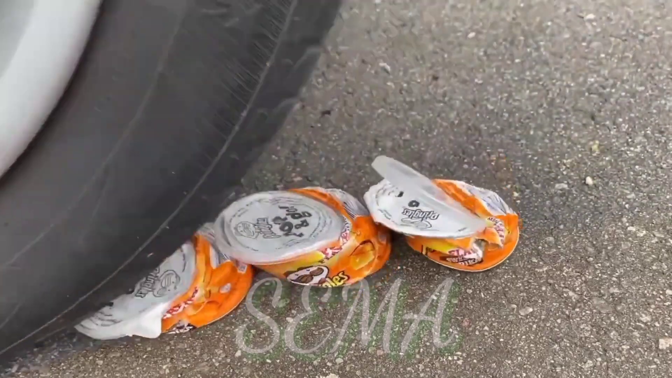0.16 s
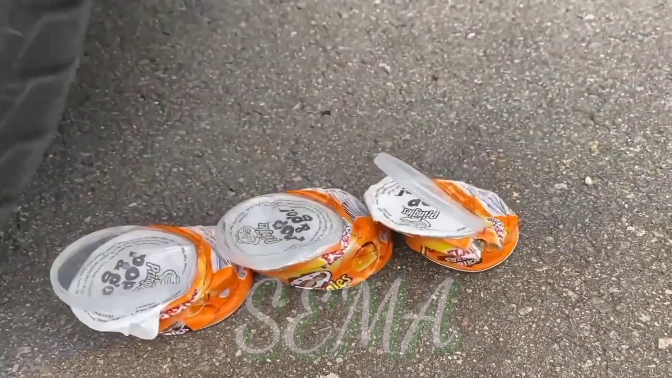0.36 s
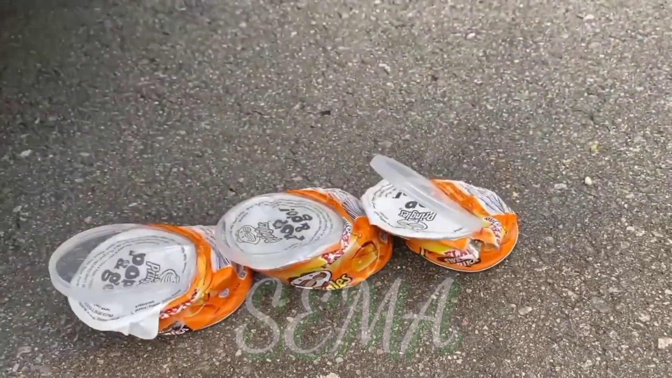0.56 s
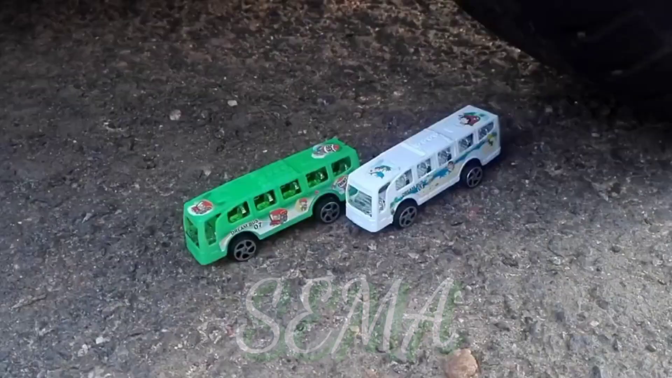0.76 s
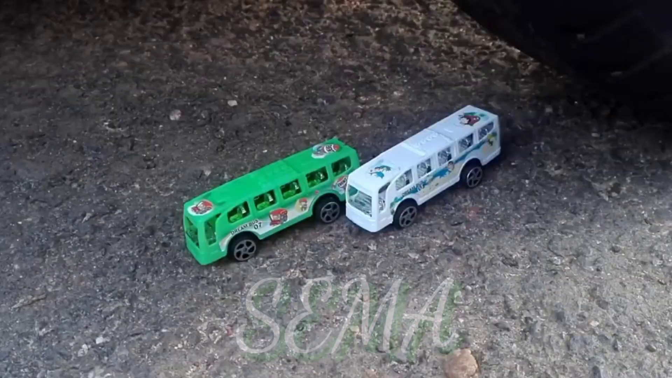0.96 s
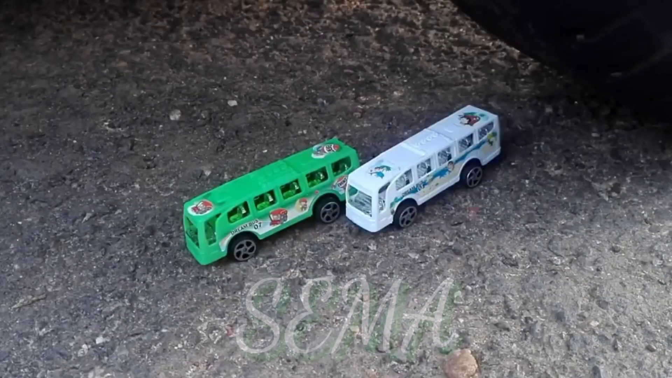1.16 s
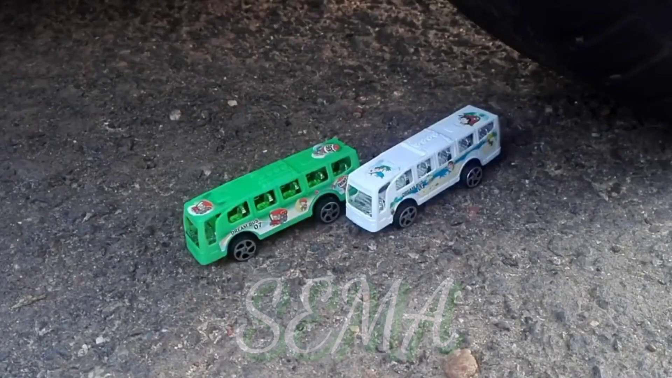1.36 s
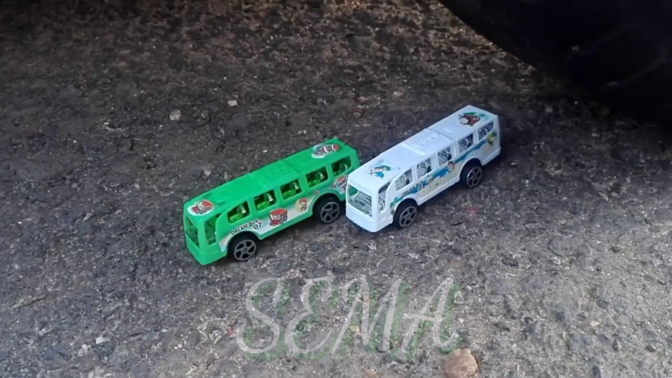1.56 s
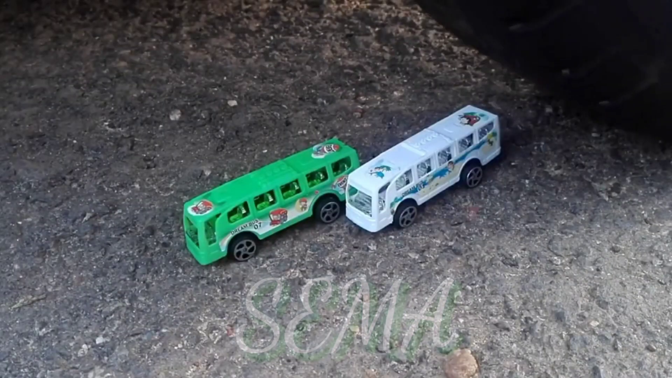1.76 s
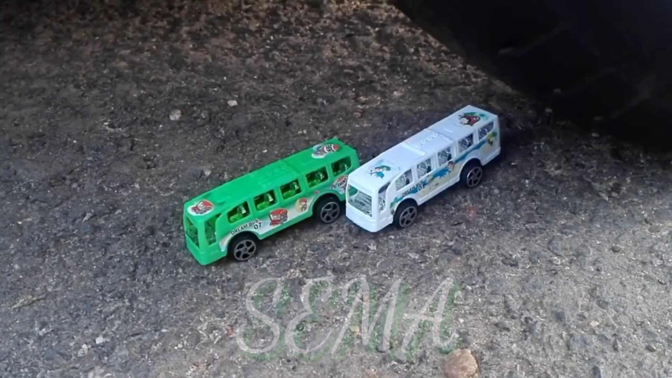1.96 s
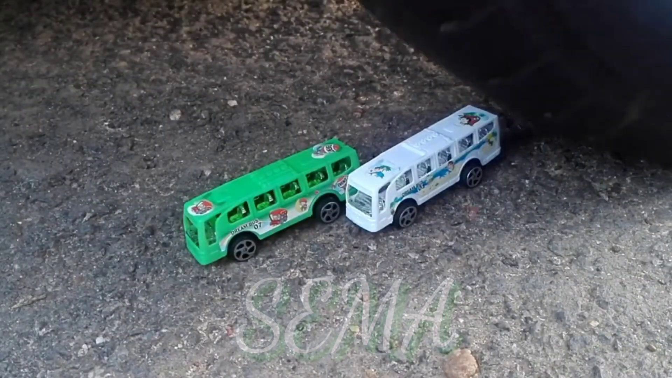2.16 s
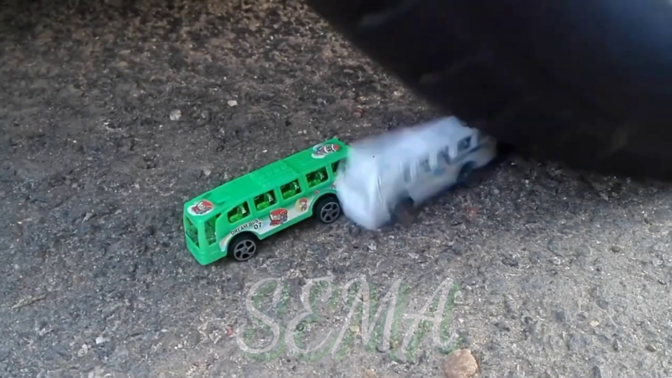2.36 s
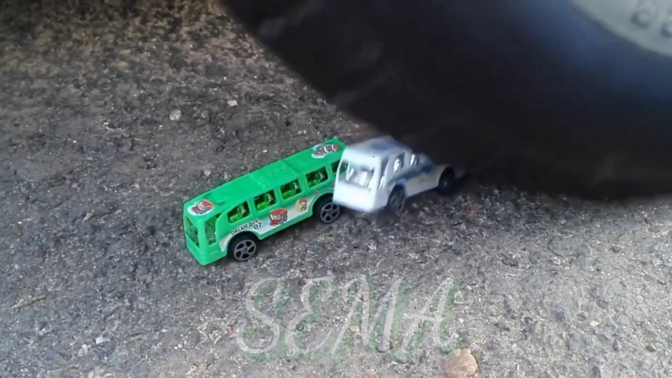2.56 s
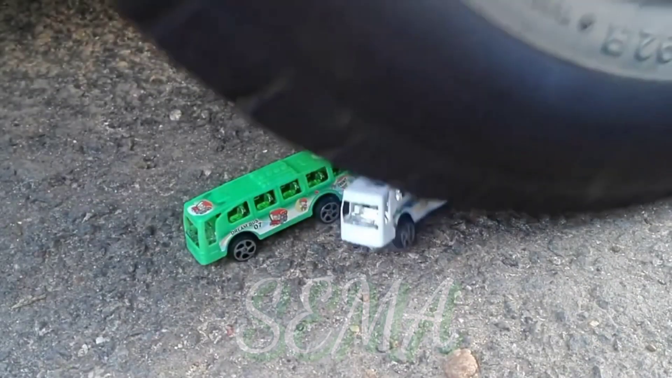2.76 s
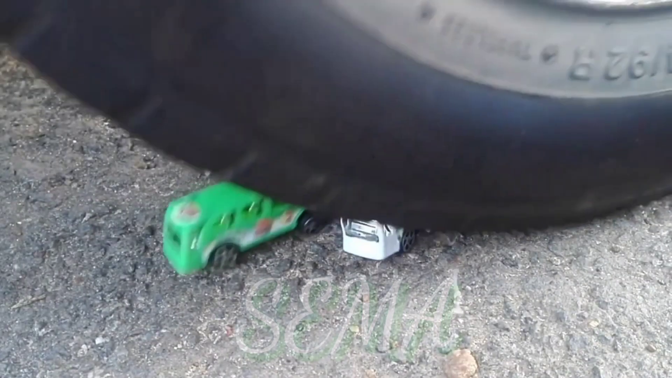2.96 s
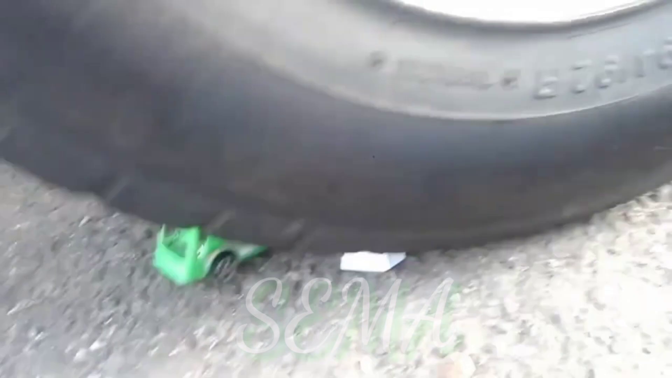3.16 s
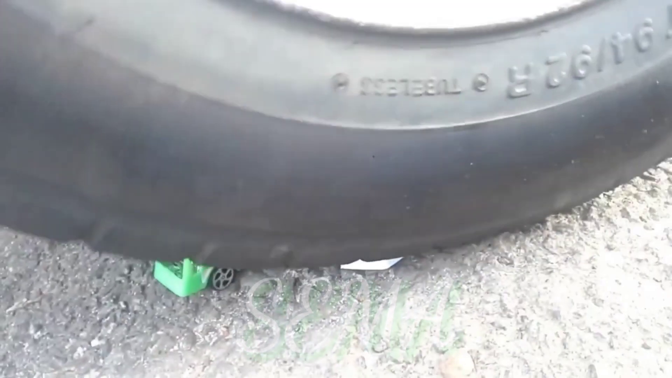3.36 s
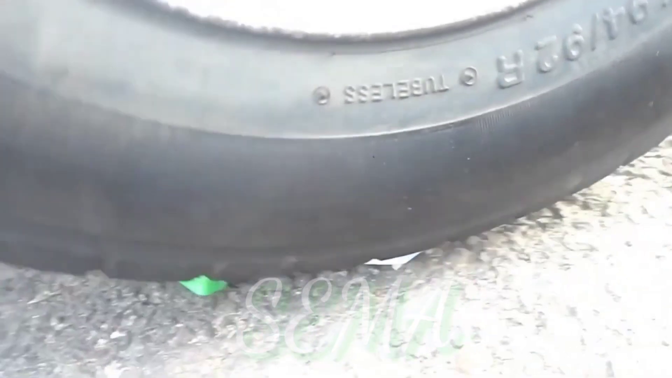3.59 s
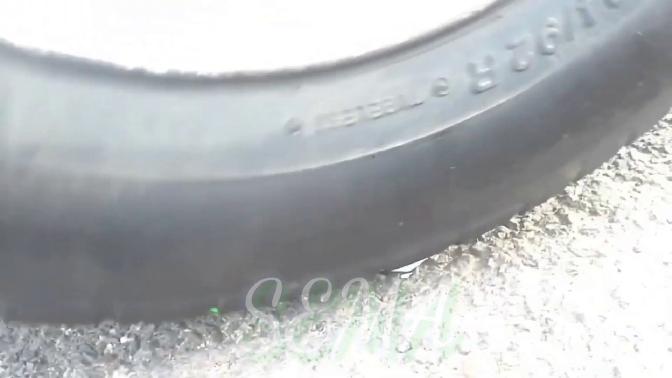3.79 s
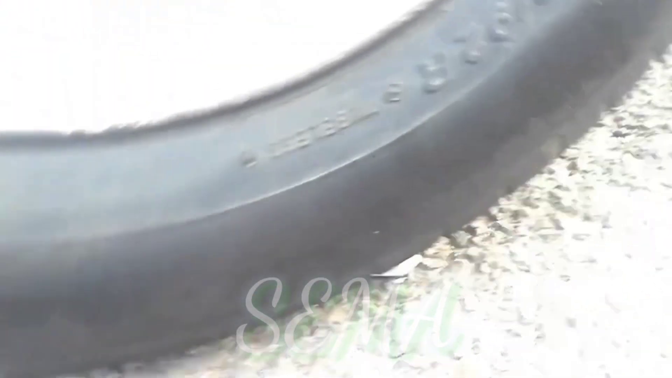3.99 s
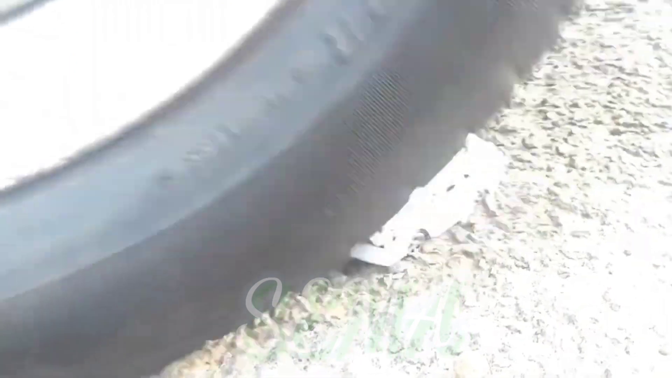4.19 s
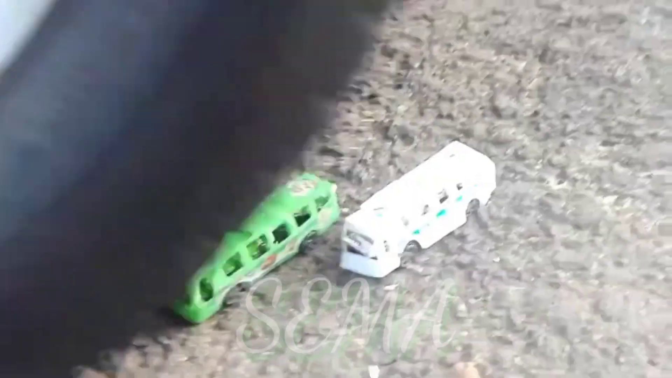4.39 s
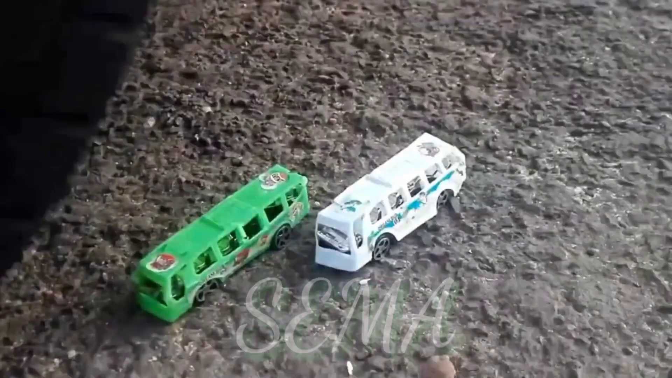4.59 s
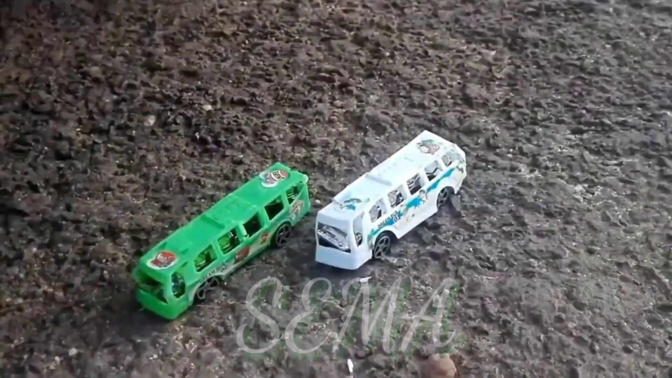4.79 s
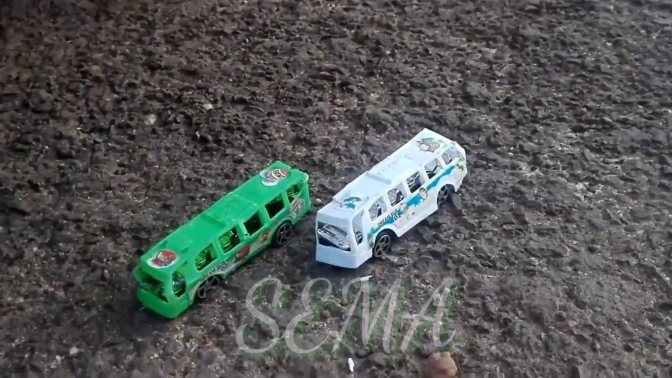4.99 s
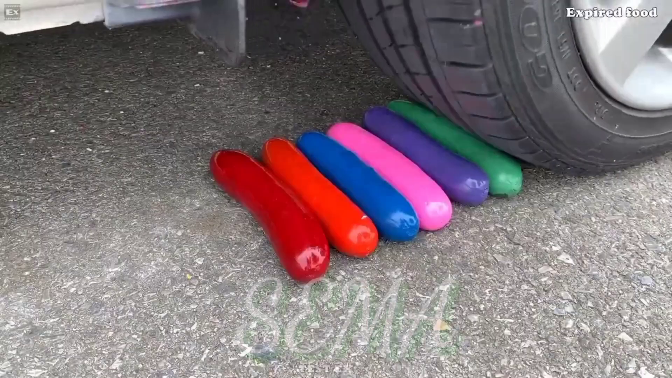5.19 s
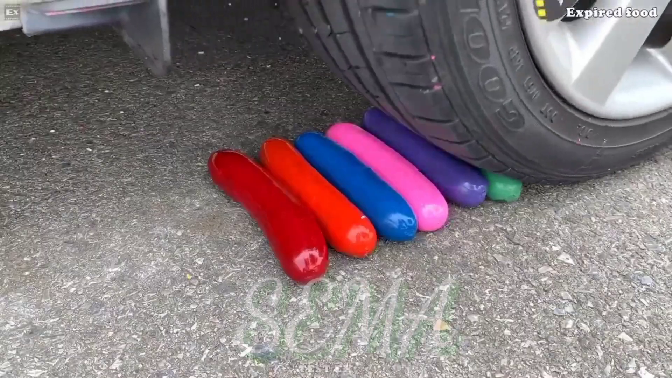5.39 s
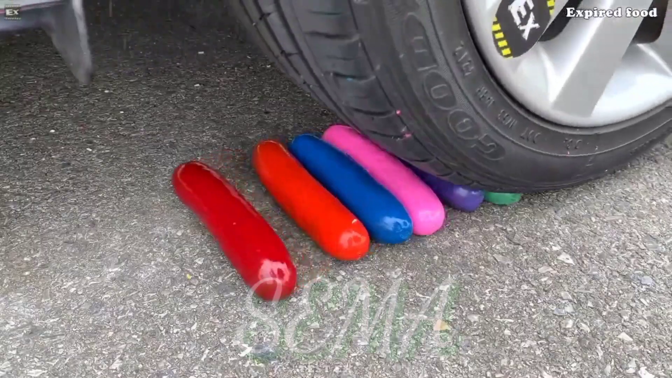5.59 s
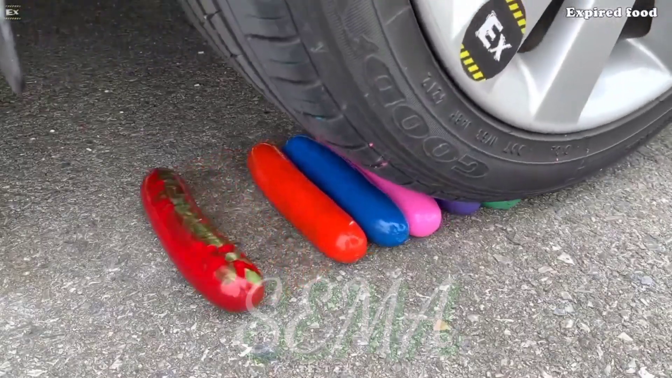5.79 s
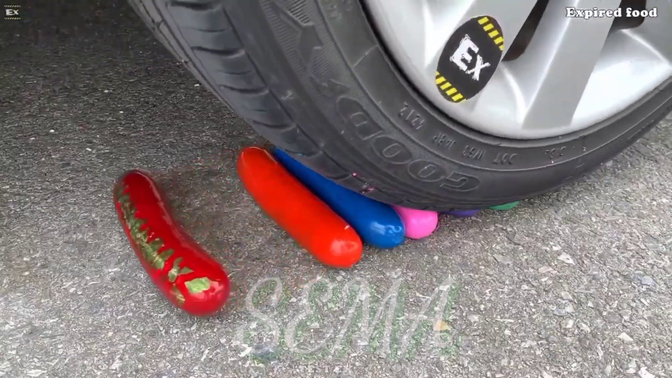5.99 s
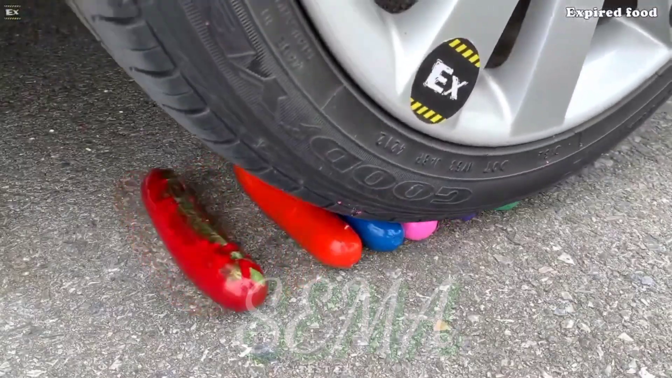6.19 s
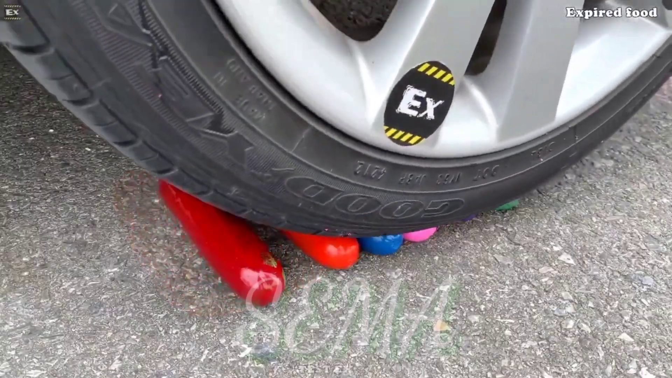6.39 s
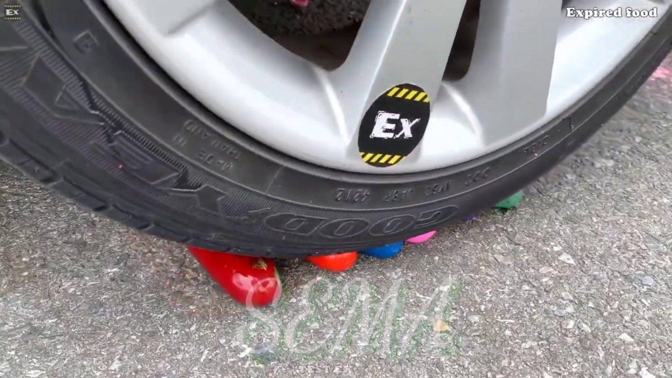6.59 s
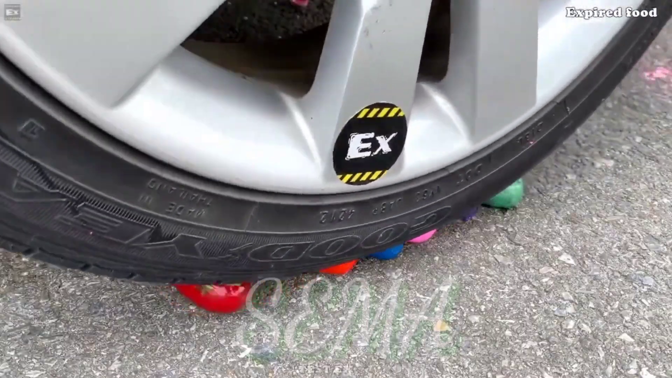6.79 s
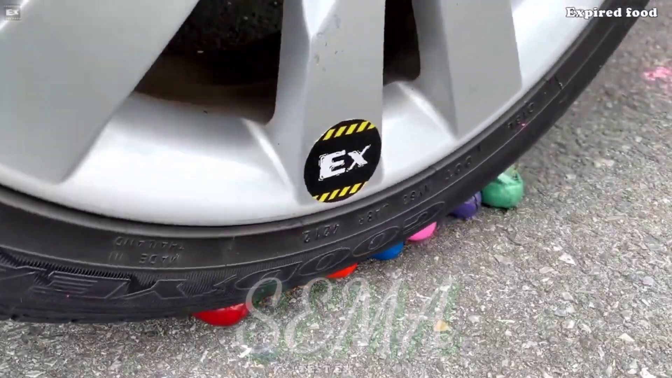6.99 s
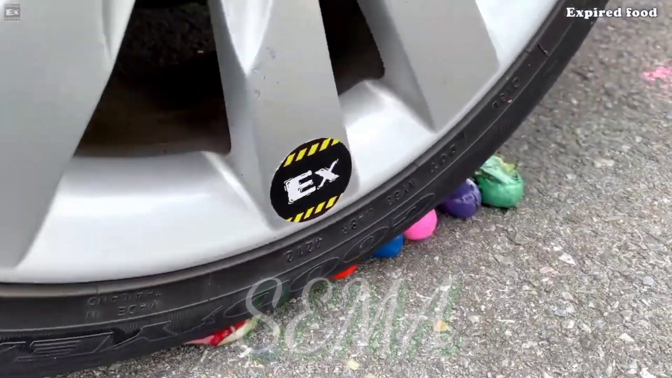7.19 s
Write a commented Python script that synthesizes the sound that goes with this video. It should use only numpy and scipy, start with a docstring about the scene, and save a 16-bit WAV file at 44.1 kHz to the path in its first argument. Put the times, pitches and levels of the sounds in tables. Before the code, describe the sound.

Outdoors, very close to a car tyre on rough asphalt. Soft cups pop with one sharp smack over a faint engine idle. The sound drops to quiet rolling with small ticks, then hard plastic toys break in a dense, bright volley of cracks. Freed pieces scrape and rattle lightly. Abruptly the rolling gets louder and wider, and brittle sticks snap with woody knocks while the engine pulls harder.

```python
"""Tread grinding on rough asphalt over rumble and engine idle; cups, then plastic toys, then brittle sticks break.
Three spliced shots: stereo, mono, stereo. Rolling is shaped noise; hum and engine are sines.
Each break sums a splinter burst, a short modal ring and a falling thump; slow crushing and rubs are grainy noise.
The engine pulls over the last sticks. Loud peaks saturate."""
import sys
import numpy as np
from scipy import signal
from scipy.fft import rfft, irfft, next_fast_len
from scipy.io import wavfile
from scipy.ndimage import uniform_filter1d, map_coordinates

SR = 44100
rng = np.random.default_rng(int(sys.argv[2]) if len(sys.argv) > 2 else 0)


def pcm_store(signal):
    """Save signal as 16-bit PCM."""
    levels = np.round(np.clip(np.atleast_2d(signal), -1, 1) * 32767)
    wavfile.write(sys.argv[1], SR, levels.astype(np.int16).T)


N = 319725

# rolling car, one table per shot: t/s, rumble level/dB, grinding level/dB
ROLL = [
    [(0.0, -32, -28), (0.04, -35.5, -42), (0.472, -36, -49), (0.756, -32.5, -49.5), (0.856, -31.5, -45),
     (0.97, -71, -50.5)],
    [(0.97, -48, -61.5), (1.18, -73.5, -57.5), (1.43, -39.5, -48), (1.64, -33, -44.5), (1.82, -44.5, -56.5),
     (2.04, -58.5, -90), (2.12, -32.5, -44), (2.52, -57, -83.5), (2.7, -66.5, -70.5), (3.07, -37, -48),
     (3.43, -44.5, -52.5), (3.8, -37, -63), (3.98, -33.5, -45.5), (4.21, -44.5, -56.5), (4.74, -55, -50.5),
     (4.81, -36, -45.5), (5.06, -46, -50.5), (5.24, -30, -48.5), (5.45, -47, -55.5)],
    [(5.46, -25, -49), (5.528, -22, -25.5), (5.65, -23.5, -34.5), (6.012, -20.5, -34), (6.302, -25.5, -31),
     (6.686, -19.5, -31), (6.876, -28.5, -34), (7.25, -32, -31.5)],
]
# per shot, over the driving level: drone/dB, grit/dB, hiss/dB
SHOT_LEVELS = [(0.5, -4, -24.5), (3.5, -6.5, -27), (1.5, -3, -7)]
# noise spectra: f/Hz, relative density/dB
RUMBLE = [(18, -20.5), (35, -13), (70, 5), (120, -4), (160, -15.5)]
DRONE = [(95, -19.5), (135, 9), (250, 4), (365, -3.5), (430, -9.5), (650, -31)]
GRIT = [(1500, -2), (2200, -3.5), (3500, -8), (5500, -14), (8000, -28), (12000, -44)]
HISS = [(4500, -16.5), (6500, -9.5), (9000, -10.5), (14300, -10), (15000, -28), (16500, -44)]
CRACKLE = [(1300, 5), (2000, -3.5), (4500, -9), (7000, -12.5), (14000, -14.5), (15000, -37)]
# splinter spectra of toys, sticks, cups: f/Hz, relative density/dB
PLASTIC = [(880, -3), (1500, -0.5), (2500, -1.5), (3880, -4), (7500, -5), (13100, -3.5), (14500, -1),
           (16400, -57)]
BRITTLE = [(880, -9.5), (1500, -13), (2310, -18.5), (3880, -23), (4690, -25.5), (13800, -26.5),
           (15400, -29), (16400, -65)]
CARD = [(880, -30.5), (1500, 7), (2260, 6.5), (3620, -8.5), (6210, -12.5), (12100, -62), (16400, -92.5)]
# resonances of tread, hollow under it, toy shell, bodywork: f/Hz, width/Hz, relative gain/dB
TREAD = [(386, 430, -11), (898, 236, -8), (1340, 260, -9.5)]
HOLLOW = [(295, 470, -13), (766, 69, -5.5), (950, 44, 3), (1400, 1300, -16.5)]
SHELL = [(950, 84, 4), (1236, 130, 8.5), (2090, 300, -2), (3220, 190, 1), (5180, 100, -6), (6450, 130, -17)]
BODYWORK = [(79.7, 29.5, 3.5), (170, 73, -19), (244, 36, 2.5), (725, 66, -18)]
# resonances of the breaking things: f/Hz, width/Hz, relative gain/dB
CUP_MODES = [(450, 83, 0.5), (620, 140, 1.5), (880, 266, -7), (1280, 710, -9.5)]
TOY_MODES = [(698, 210, -6.5), (980, 110, -1), (1205, 85, 2), (1560, 150, -3), (2060, 160, -7.5),
             (3400, 430, -13.5)]
STICK_MODES = [(340.5, 110, 15), (970, 267, -1), (1340, 113, -5), (1800, 860, -12), (2510, 650, -18.5)]
# humming tones of the car, one table per tone: t/s, f/Hz, nominal rms level/dB
HUM = [
    [(1.62, 179.5, -45), (1.742, 181, -25), (2.02, 183.6, -51)],
    [(5.6, 228.7, -18), (5.8, 231.4, -24), (5.9, 236, -31)],
    [(.76, 29.8, -28), (.85, 29.6, -22.5), (.97, 30.6, -32)],
    [(1.53, 213, -40), (1.575, 219, -35.5), (1.63, 228, -51)],
    [(1.6, 347, -44), (1.665, 346, -37), (1.72, 340, -45)],
]
# idling engine: t/s, firing rate/Hz, gain/dB
IDLE = [(0.0, 29.54, -32.5), (0.689, 25.68, -34), (0.969, 26.6, -35.5)]
# gain of multiples 1, 2, 3 .. of the firing rate: level/dB
ORDER_DB = [0, -4.5, 3, -18.5, -8, -48, -9, -12, -30, -19.5]
# pulling engine: t/s, cycle rate/Hz, gain/dB
REV = [(6.1, 26.41, -26), (6.298, 26.42, -31), (6.499, 28.01, -26.5), (6.602, 33.14, -22.5),
       (6.7, 36.63, -14.5), (6.8, 42.4, -19.5), (6.9, 46.75, -21.5), (7.001, 50.4, -20), (7.079, 48.9, -18),
       (7.25, 41.46, -27)]
# slow crushing: t/s, nominal length/s, groan gain/dB, crackle gain/dB, peak position on the envelope axis
CRUNCHES = [(2.051, 0.039, -34.5, -33.5, 0.13), (2.106, 0.083, -25, -57, 0.25),
            (2.864, 0.067, -26, -40, 0.15), (2.919, 0.092, -25.5, -40.5, 0.33),
            (3.033, 0.099, -28, -31, 0.16), (3.486, 0.11, -24.5, -36, 0.088),
            (3.743, 0.061, -27, -43, 0.066), (3.888, 0.028, -19.5, -21, 0.33),
            (4.329, 0.13, -37.5, -33.5, 0.035), (5.44, 0.21, -23, -20.5, 0.63),
            (5.789, 0.15, -12.5, -16, 0.76), (6.007, 0.054, -13, -21.5, 0.38),
            (6.664, 0.16, -22, -24, 0.39), (7.128, 0.19, -24.5, -59, 0.27)]
# freed toys scraping and rocking: t/s, main length/s, gain/dB, favoured f/Hz
SCUFFS = [(4.801, 0.029, -35.5, 3000), (4.871, 0.11, -36.5, 1140), (4.926, 0.036, -36, 2520),
          (4.991, 0.028, -43, 2000), (5.02, 0.049, -38, 3500), (5.064, 0.05, -36.5, 1200),
          (5.104, 0.037, -34.5, 2000), (5.135, 0.062, -26, 5100), (5.224, 0.056, -28.5, 3270)]
# deep knocks with some breaks: t/s, nominal level/dB, f/Hz
THUDS = [(4.335, -4, 120), (5.59, 1.5, 321), (5.625, 11, 345), (6.761, -1, 314), (7.155, 9, 190)]
# grit spat from under the tread: t/s, peak level/dB
SPITS = [(5.803, -8.5), (6.085, -11.5), (6.168, -12.5), (6.176, -11), (6.32, -14)]
# breaks: t/s, splinter peak/dB, ring over splinters/dB, pitch/Hz, crack t60/s (limited in breaks())
CUPS = [(0.0502, -33, 8.5, 910, 0.011), (0.095, -40, 15.5, 646, 0.0072), (0.1489, -2, -1, 890, 0.0076),
        (0.182, -23.5, 2, 880, 0.014), (0.205, -28.5, 0, 800, 0.0082), (0.2467, -28, 14, 920, 0.0092),
        (0.371, -33, -5, 2000, 0.013), (0.3853, -22.5, 11, 795, 0.016), (0.405, -26, 4.5, 680, .01),
        (0.926, -30, -9, 1362, 0.022)]
TOYS = [(1.4671, -30, 7, 3630, 0.03), (1.7213, -19.5, -0.5, 4100, 0.039), (2.048, -14, -4, 3970, 0.022),
        (2.1173, -14.5, -8, 3160, 0.033), (2.591, -22.5, -35, 6600, 0.16), (2.654, -24, -24, 5300, 0.079),
        (2.6988, -18.5, -30, 7700, 0.0051), (2.774, -25, -5, 4300, 0.075), (2.8546, 6, -18.5, 7640, 0.019),
        (3.0167, -6.5, -26, 6030, 0.0044), (3.0749, 1.5, -4.5, 7900, 0.032), (3.1026, 8, -9, 7400, 0.013),
        (3.1201, -11, -10.5, 7100.0, 0.0088), (3.1904, 2, -35.5, 8240, 0.0057),
        (3.2053, 4, -37.5, 8400, 0.023), (3.236, -9, -13.5, 6850, 0.0069), (3.2473, -2, -2.5, 7600, 0.014),
        (3.2715, 0.5, -33.5, 11300, 0.017), (3.3003, -8, -0.5, 4730, 0.048), (3.325, 1.5, -35, 8900, 0.016),
        (3.3321, 2.5, -12.5, 2980, 0.018), (3.36, -7.5, -15.5, 5160, 0.01),
        (3.374, -10, -17.5, 7000.0, 0.0067), (3.4083, -10.5, -36, 5770, 0.011),
        (3.4284, 0, -11, 7700, 0.014), (3.5022, 1.5, -17.5, 5940, 0.028), (3.51, -3.5, 4.5, 6470, 0.016),
        (3.5207, -20.5, -12, 3800.0, 0.012), (3.5635, 0, -34, 11100, 0.034), (3.603, 2.5, -15, 9400, 0.026),
        (3.7762, -6, -13, 8150, 0.0048), (3.8171, -16, -2.5, 5370, 0.0079), (3.8331, -16, -5, 3500, 0.013),
        (3.8617, -26.5, -3.5, 5040, 0.026), (3.8935, 7.5, -9, 7000, 0.011), (3.908, -7.5, 1, 6000.0, 0.014),
        (3.9147, 2.5, -13, 7000, 0.032), (3.9692, 2.5, -12, 8800, 0.011), (3.9798, -1.5, -19, 9500, 0.028),
        (4.0082, 2.5, -34, 7200, 0.0051), (4.022, 6.5, -16.5, 8340, 0.016),
        (4.0556, -9.5, -25.5, 10000.0, 0.0059), (4.07, 0.5, -4, 7400, 0.013),
        (4.1732, -2.5, -11.5, 7300, 0.036), (4.334, 0.5, 1, 8160, 0.032), (4.3865, -13, -15, 4500, 0.0099),
        (4.452, -15, -33, 8700.0, 0.01), (4.4684, -12, -35, 4240, 0.0059), (4.49, -13, -20, 4730, 0.022),
        (4.529, -5, -34, 4160, 0.0056), (4.565, -24, -11, 3350, 0.015)]
STICKS = [(5.491, -19, 6, 987, 0.014), (5.505, -7, -5, 1550, 0.014), (5.589, -2, 5, 986, 0.04),
          (5.624, 0, -1, 1340, 0.025), (5.698, -12.5, 1, 1170, 0.023), (5.732, -14.5, -2.5, 1073, 0.016),
          (5.832, -6.5, -4, 987, 0.031), (5.872, -13, -2.5, 976, 0.048), (5.916, 3, 0, 1305, 0.063),
          (5.989, 3.5, -5, 1170, 0.034), (6.022, 5, 3, 1305, 0.022), (6.104, 0, -7.5, 1160, 0.08),
          (6.235, -4.5, -1, 1410, 0.036), (6.346, 4.5, -34, 1590, 0.0028), (6.382, 1.5, -4, 704, 0.017),
          (6.552, -12.5, 0.5, 1810, 0.02), (6.711, 2, 4, 1180, 0.022), (6.761, -2.5, 10.5, 942, 0.042),
          (6.842, -30, 16.5, 1190, 0.013), (6.989, -27, 21, 1250, 0.012), (7.026, -19.5, 4.5, 1400, 0.03),
          (7.152, -4, 7.5, 830, 0.0062), (7.243, -3.5, 4.5, 1157, 0.03)]
# left-right likeness: f/Hz, correlation [0..1]
LIKENESS = [(60, 0.98), (150, 0.99), (380, 0.69), (950, 0.44), (2380, 0.22), (5980, 0.063), (15000, 0.01)]

MONO_START_S, MONO_END_S = 0.97, 5.45
TOP_HZ = 16500
DRONE_SHARE = 0.55  # drone dB lies between grinding (0) and rumble (1)
HISS_FLOOR_DB = -77.5
LUMPS_DB = 1.6  # slow unevenness
SETTLE_DB, SETTLE_T60_S = -35.5, 0.16  # grainy rustle dying away after each toy break, re its splinters
STRAIN_START_S, STRAIN_END_S, STRAIN_DB = 2.55, 4.6, -54  # faint ticking
TICKS_PER_S, TICK_T60_S, TICK_SCATTER_DB = 180, 0.013, 3
SCUFF_RISE = 0.07  # share of main length
SCUFF_TOP_HZ, SCUFF_BRIGHTENS = 5600, 0.3  # treble corner of a -42 dB rub; dB of corner per dB of rub
GRAIN_DB = 2.2  # unevenness of a rub
THUD_T60_S, SPIT_T60_S = 0.027, 0.014
SNAP_DB, SNAP_T60_S = 7, 0.0011  # first instant of a crack, over its noise
THUMP_FOLLOWS = 0.94  # dB of thump per dB of ring
FOCUS_OCTAVES = 0.81  # Gaussian sigma round a fragment's pitch
PIECE_Q = 5.46
UNEVEN_DB = 4  # spread of one fragment's colour about its material's


def amp(db):
    """dB to linear gain."""
    return 10 ** (np.asarray(db) / 20)


def decay(t, t60_s):
    """Exponential fall of 60 dB in t60_s."""
    return amp(-60 * t / t60_s)


def unit(x):
    """Scale to unit rms."""
    return x / np.sqrt(np.mean(x ** 2) + 1e-20)


def along(points, hz):
    """Interpolate (Hz, value) points on a log frequency axis."""
    f, v = np.transpose(points)
    return np.interp(np.log(hz + 1), np.log(f + 1), v)


def bell(hz, centre_hz, octaves):
    """Gaussian on the octave axis."""
    return np.exp(-0.5 * (np.log2(hz / centre_hz) / octaves) ** 2)


def filtered(x, response, size=None):
    """Multiply the spectrum of x by a complex response of frequency."""
    m = size or next_fast_len(N + 4096)
    return irfft(rfft(x, m) * response(np.fft.rfftfreq(m, 1 / SR)), m)[..., :x.shape[-1]]


def colour(spectrum):
    """Gain of a spectrum, silent beyond its ends."""
    low_hz, high_hz = spectrum[0][0], spectrum[-1][0]
    return lambda hz: amp(along(spectrum, hz)) * (hz > low_hz) * (hz < high_hz)


def modes(table, gains=1):
    """Causal sum of resonances with alternating sign, each with its own extra gain."""
    gains = np.broadcast_to(gains, len(table))

    def response(f):
        total = 0
        for k, ((centre, width, db), gain) in enumerate(zip(table, gains)):
            damping = 1j * f * width
            total = total + (-1) ** k * gain * amp(db) * damping / (centre ** 2 - f ** 2 + damping)
        return total
    return response


def wobble(rate, count=N):
    """Smooth random curve, rate knots/s, evaluated every 16 samples."""
    steps = np.arange(0, count + 16, 16)
    coarse = map_coordinates(rng.standard_normal(4096), [steps * rate / SR])
    return np.interp(np.arange(count), steps, coarse)


def place(track, start_s, sound):
    """Add a sound to a track in place, cut at its end."""
    room = track[..., round(start_s * SR):][..., :sound.shape[-1]]
    room += sound[..., :room.shape[-1]]


def crumbs(response, fast_db, slow_db):
    """Two unrelated noises sharing fast grain and slow lump level fluctuation."""
    lumps = amp(fast_db * wobble(400) + slow_db * wobble(35))
    return unit(filtered(lumps * rng.standard_normal((2, N)), response))


def ticks(response):
    """Irregular decaying noise ticks of unequal size."""
    hits = (rng.random(N) < TICKS_PER_S / SR) * amp(TICK_SCATTER_DB * rng.standard_normal(N))
    tails = signal.lfilter([1], [1, -decay(1 / SR, TICK_T60_S)], hits)
    return unit(filtered(tails * rng.standard_normal((2, N)), response))


def rolling():
    """Car rumble, tread grinding stones and debris, rustle after toy breaks, faint ticking: shaped noises."""
    s, rumble_db, grind_db = np.transpose(np.concatenate(ROLL))
    drone_db, grit_db, hiss_db = np.repeat(SHOT_LEVELS, [len(shot) for shot in ROLL], axis=0).T
    drone_db = drone_db + grind_db + DRONE_SHARE * (rumble_db - grind_db)
    t = np.arange(N) / SR

    def level(db):
        return amp(np.interp(t, s, db))

    def tread(f):
        return modes(TREAD)(f) / (1 + (f / 2200) ** 4)

    out = level(rumble_db) * crumbs(colour(RUMBLE), fast_db=3.5, slow_db=5.0)
    out += level(drone_db) * crumbs(colour(DRONE), fast_db=4.0, slow_db=LUMPS_DB)
    out += level(grind_db) * crumbs(tread, fast_db=3.0, slow_db=LUMPS_DB)
    out += level(grind_db + grit_db) * crumbs(colour(GRIT), fast_db=2.0, slow_db=LUMPS_DB)
    hiss = level(grind_db + hiss_db) + amp(HISS_FLOOR_DB)
    out += hiss * crumbs(colour(HISS), fast_db=1.2, slow_db=0.7)

    toy_s, toy_db = np.array(TOYS)[:, :2].T
    cracks = np.zeros(N)
    cracks[np.round(toy_s * SR).astype(int)] = amp(toy_db + SETTLE_DB)
    rustle = signal.lfilter([1], [1, -decay(1 / SR, SETTLE_T60_S)], cracks)
    out += rustle * crumbs(colour(PLASTIC), fast_db=6.0, slow_db=-1.5)
    strained = (t > STRAIN_START_S) * (t < STRAIN_END_S)
    return out + amp(STRAIN_DB) * strained * ticks(colour(PLASTIC))


def hum():
    """Low sines of the car, slightly unsteady in phase and level."""
    out = np.zeros(N)
    for rows in HUM:
        s, hz, db = np.transpose(rows)
        t = np.arange(s[0], s[-1], 1 / SR)
        fade = np.clip(np.minimum(t - s[0], s[-1] - t) / 0.026, 0, 1)
        phase = 2 * np.pi * np.cumsum(np.interp(t, s, hz)) / SR + 0.25 * wobble(40.6, len(t))
        level = np.sqrt(2) * amp(np.interp(t, s, db) + 1.7 * wobble(31.0, len(t)))
        place(out, s[0], fade * level * np.sin(phase))
    return out


def idle():
    """Idling engine: multiples of the firing rate, each wavering in level and phase."""
    s, hz, db = np.transpose(IDLE)
    t = np.arange(0, s[-1], 1 / SR)
    turn = 2 * np.pi * np.cumsum(np.interp(t, s, hz)) / SR
    stack = np.zeros(len(t))
    for k, order_db in enumerate(ORDER_DB, start=1):
        level = amp(order_db + LUMPS_DB * wobble(6, len(t)))
        stack += level * np.sin(k * turn + 0.5 * wobble(6.4, len(t)))
    fade = np.clip((s[-1] - t) / 0.044, 0, 1)
    return np.pad(stack * amp(np.interp(t, s, db)) * fade, (0, N - len(t)))


def rev():
    """Pulling engine: 30 multiples of the cycle rate, loud where they cross bodywork resonances."""
    s, hz, db = np.transpose(REV)
    t = np.arange(s[0], s[-1], 1 / SR)
    rate = np.interp(t, s, hz)
    turn = 2 * np.pi * np.cumsum(rate) / SR

    def body(f):
        return sum(amp(gain) / (1 + (2 * (f - c) / w) ** 2) for c, w, gain in BODYWORK)

    stack = np.zeros(len(t))
    for k in range(1, 31):
        level = body(k * rate) * amp(2.9 * wobble(6, len(t)))
        stack += level * np.sin(k * turn + 0.4 * wobble(4.5, len(t)) + k * k)
    out = np.zeros(N)
    place(out, s[0], stack * amp(np.interp(t, s, db)) * np.clip((t - s[0]) / 0.17, 0, 1))
    return out


def crunches():
    """Slow crushing: groan of the hollow under the tread plus fragment crackle, both swelling noise."""
    groan, crackle = np.zeros((2, N))
    for s, length, groan_db, crackle_db, peak in CRUNCHES:
        u = np.linspace(0, 1.3, round(1.23 * length * SR))
        shape = np.interp(u, [0, np.clip(peak, 0.02, 0.98), 1.3], [0, 1, 0]) ** 1.38
        place(groan, s, amp(groan_db) * shape)
        place(crackle, s, amp(crackle_db) * shape)

    def dull(f):
        return modes(HOLLOW)(f) / (1 + (f / 2400) ** 2)

    return (groan * crumbs(dull, fast_db=0.5, slow_db=3.0)
            + crackle * crumbs(colour(CRACKLE), fast_db=3.0, slow_db=3.5))


def scuffs():
    """Gritty rubs through the toy shell, each favouring other modes; louder rubs are brighter."""
    out = np.zeros(N)
    for s, length, db, pitch_hz in SCUFFS:
        u = np.linspace(0, 1.5, round(1.5 * length * SR))
        grains = amp(GRAIN_DB * wobble(511, count=8192)) * rng.standard_normal(8192)
        shell = modes(SHELL, amp(10 * bell(np.array(SHELL)[:, 0], pitch_hz, 0.21)))
        top_hz = SCUFF_TOP_HZ * amp(SCUFF_BRIGHTENS * (db + 42))

        def response(f):
            return (np.abs(shell(f)) + amp(-10)) * (f > 300) / (1 + (f / top_hz) ** 8)

        rub = unit(filtered(grains, response, size=8192))
        shape = np.interp(u, [0, SCUFF_RISE, 1, 1.5], [0, 0.9, 0.0, 0.062])
        place(out, s, amp(db) * shape * rub[:len(u)])
    return out


def thuds():
    """Low cycles of a hollow piece: decaying sines."""
    out, t = np.zeros(N), np.arange(SR // 10) / SR
    for s, db, hz in THUDS:
        envelope = amp(db) * decay(t, THUD_T60_S) * (1 - np.exp(-t / 0.0023))
        place(out, s, envelope * np.sin(2 * np.pi * hz * t))
    return out


def spits():
    """Spat grit: short bright decaying noise."""
    out, t = np.zeros((2, N)), np.arange(2000) / SR
    for s, db in SPITS:
        noise = rng.standard_normal((2, len(t))) * decay(t, SPIT_T60_S)
        tick = filtered(noise, colour(HISS), size=4096)
        place(out, s, amp(db) * tick / np.abs(tick).max())
    return out


def breaks(events, spectrum, body, focus_db, ring_focus_db, piece_db, ring_s, thump_db, thump_hz,
           debris_db, linger):
    """Splinter noise with duller debris, a rough ring of body modes, and a thump dropping in pitch."""
    t = np.arange(4000) / SR
    rise = 1 - np.exp(-t / 0.00013)
    snap = amp(SNAP_DB) * decay(t, SNAP_T60_S)
    out = np.zeros((2, N))
    thump = np.sin(2 * np.pi * (thump_hz * t + 0.84 * np.log(1 + t / 0.00093)))
    thump *= (1 - np.exp(-t / 0.0021)) * decay(t, 0.057)
    mode_hz = np.array(body)[:, 0]
    knot_hz = np.linspace(0, 16000, 110)
    for s, db, ring, pitch_hz, t60 in events:
        t60 = np.clip(t60, 0.004, 0.06)
        noise, rough, loose = rng.standard_normal((3, 2, len(t)))
        knots_db = rng.normal(0, UNEVEN_DB, size=len(knot_hz))

        def own_colour(hz):
            # uneven per fragment, boosted or cut round its pitch
            focus = bell(hz + 1, pitch_hz, FOCUS_OCTAVES)
            return colour(spectrum)(hz) * amp(focus_db * focus + np.interp(hz, knot_hz, knots_db))

        # debris lasts in proportion to the crack
        debris = uniform_filter1d(loose * amp(4 * wobble(500, len(t))), size=3)
        debris *= amp(debris_db) * decay(t, linger * t60)
        burst = noise * decay(t, t60) + noise[0] * snap + debris  # snap shared by both channels
        sharp = filtered(rise * burst, own_colour, size=8192)

        # random mode gains per break, plus the piece's own pitch
        mode_focus = bell(mode_hz + 1, pitch_hz, FOCUS_OCTAVES)
        shaken = amp(rng.normal(0, 3.36, size=len(body)) + ring_focus_db * mode_focus)
        whole = modes(body, shaken)
        piece = modes([(pitch_hz, pitch_hz / PIECE_Q, piece_db)])
        shock = rough * decay(t, ring_s) + rough[0] * snap
        shell = filtered(rise * shock, lambda f: whole(f) + piece(f), size=8192)

        place(out, s, amp(db) * sharp / np.abs(sharp).max()
              + amp(db + ring) * shell / np.abs(shell).max()
              + amp(thump_db + THUMP_FOLLOWS * (db + ring)) * thump)
    return out


def spread(pair, width):
    """Blend two renderings into left and right by frequency; the middle shot takes the first as mono."""
    def blend(hz):
        turn = width * np.arccos(np.clip(along(LIKENESS, hz), -1, 1)) / 2
        return np.array([np.cos(turn), np.sin(turn)])

    mid, side = filtered(pair, blend)
    t = np.arange(N) / SR
    lean = amp(np.where(t < MONO_START_S, 0.5, -0.8))  # first shot leans left, last right
    mono = (t > MONO_START_S) & (t < MONO_END_S)
    return np.where(mono, pair[0], [(mid + side) * lean, (mid - side) / lean])


def scene():
    """Wide rolling bed, narrow tones and knocks, fairly wide breaks."""
    bed = rolling() + crunches() + scuffs() + idle()
    narrow = np.tile(hum() + rev() + thuds(), (2, 1))
    near = spits()
    near += breaks(CUPS, CARD, CUP_MODES, focus_db=-12, ring_focus_db=11.5, piece_db=9.5, ring_s=0.014,
                   thump_db=-19.0, thump_hz=150, debris_db=-6.5, linger=6.1)
    near += breaks(TOYS, PLASTIC, TOY_MODES, focus_db=16.5, ring_focus_db=13, piece_db=-11.5, ring_s=0.014,
                   thump_db=-15.5, thump_hz=70.0, debris_db=-10.5, linger=3.9)
    near += breaks(STICKS, BRITTLE, STICK_MODES, focus_db=4.0, ring_focus_db=20.5, piece_db=24.5,
                   ring_s=0.014, thump_db=-11.5, thump_hz=326, debris_db=-9.5, linger=1.85)
    return spread(bed, width=1.0) + spread(narrow, width=0) + spread(near, width=0.8)


def record(dry):
    """Saturate peaks towards 0.88, then band-limit."""
    clipped = dry / (1 + np.abs(dry / 0.88) ** 8) ** (1 / 8)
    return filtered(clipped, lambda hz: (hz < TOP_HZ) / (1 + (hz / 14800) ** 30))


dry = scene()
out = record(dry)
pcm_store(out)
```